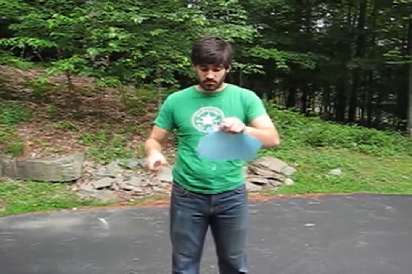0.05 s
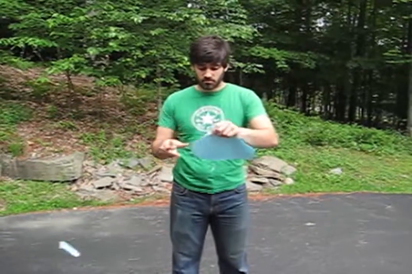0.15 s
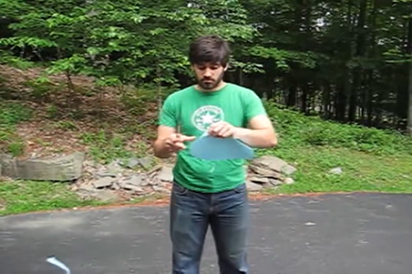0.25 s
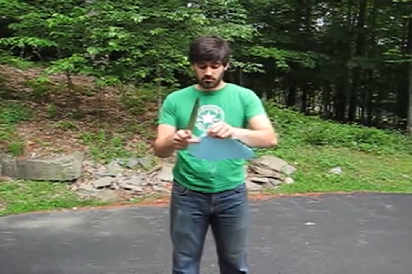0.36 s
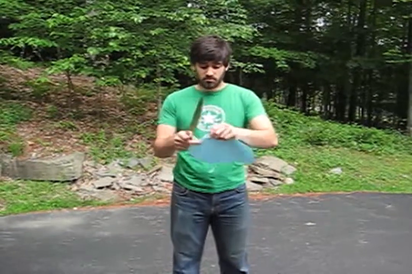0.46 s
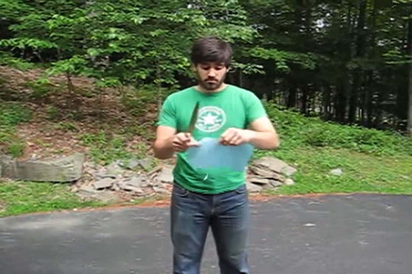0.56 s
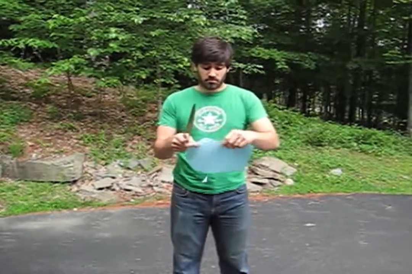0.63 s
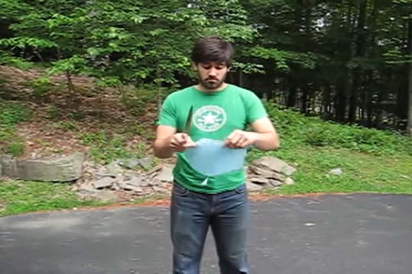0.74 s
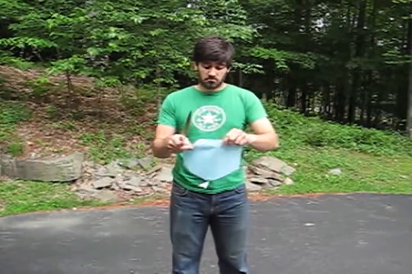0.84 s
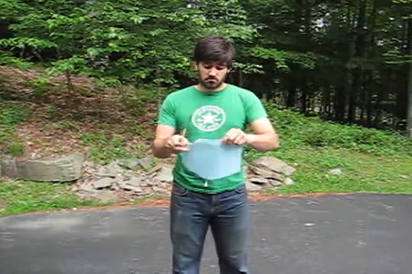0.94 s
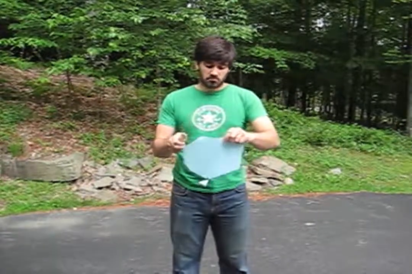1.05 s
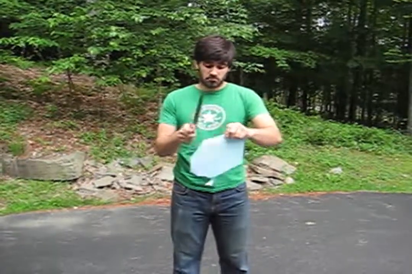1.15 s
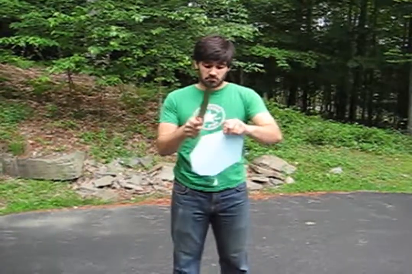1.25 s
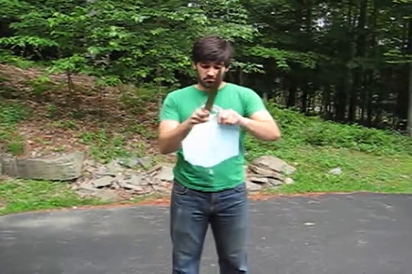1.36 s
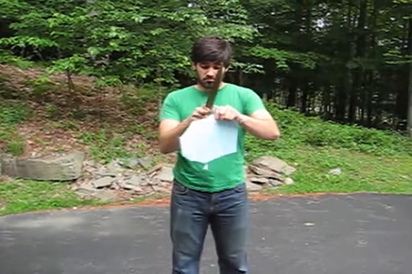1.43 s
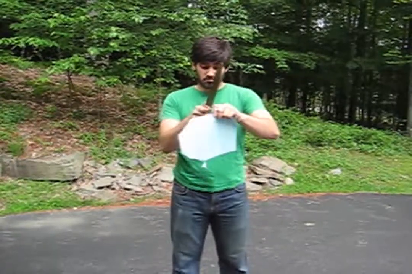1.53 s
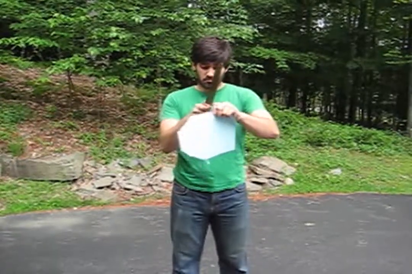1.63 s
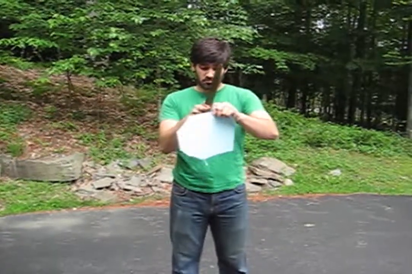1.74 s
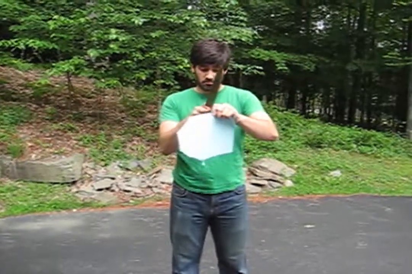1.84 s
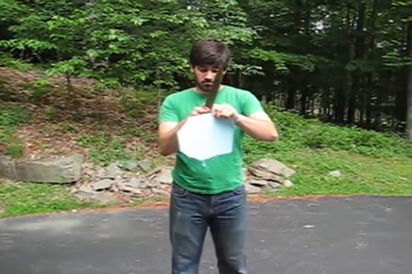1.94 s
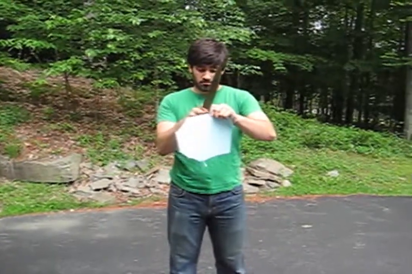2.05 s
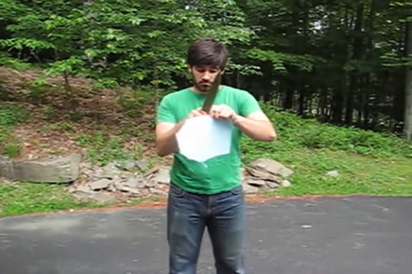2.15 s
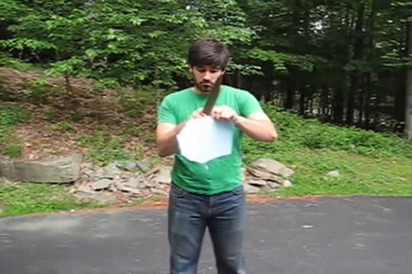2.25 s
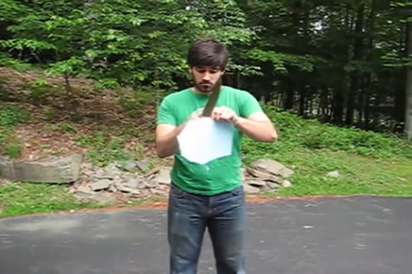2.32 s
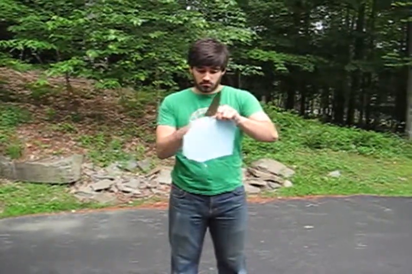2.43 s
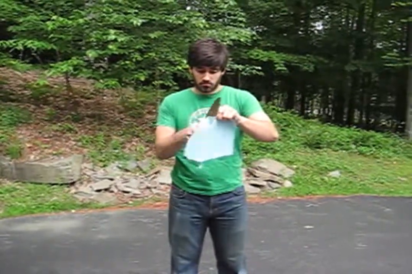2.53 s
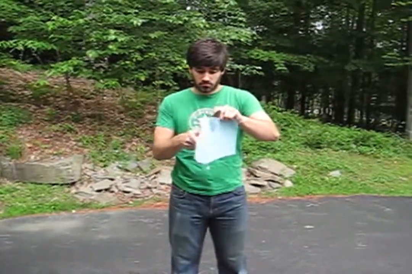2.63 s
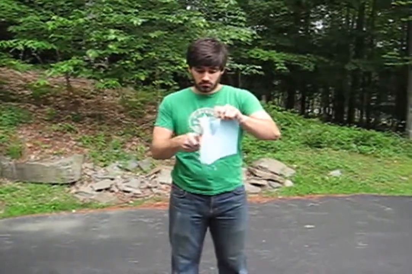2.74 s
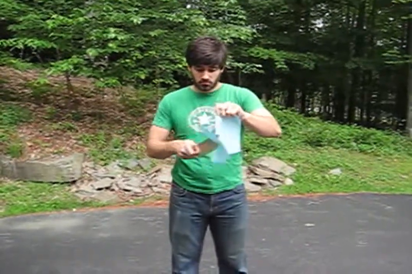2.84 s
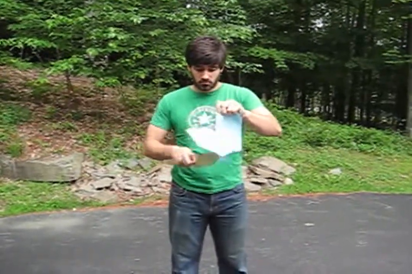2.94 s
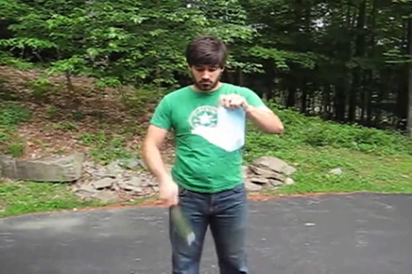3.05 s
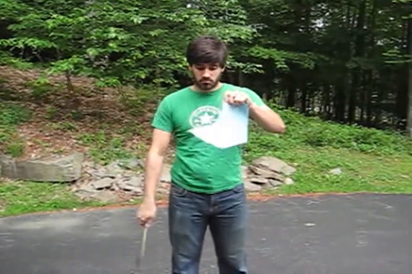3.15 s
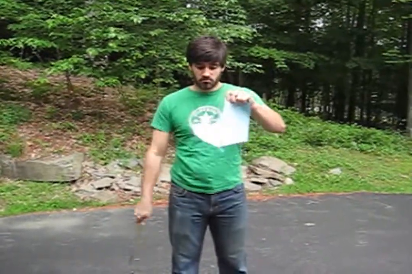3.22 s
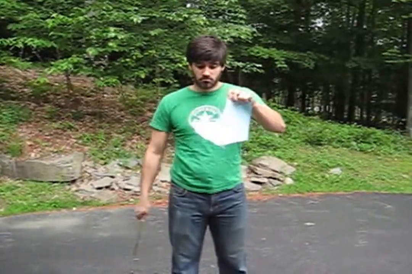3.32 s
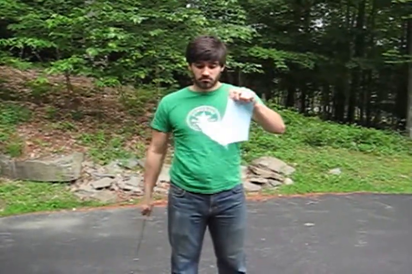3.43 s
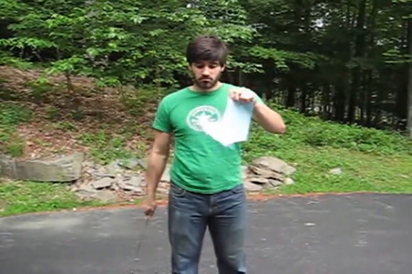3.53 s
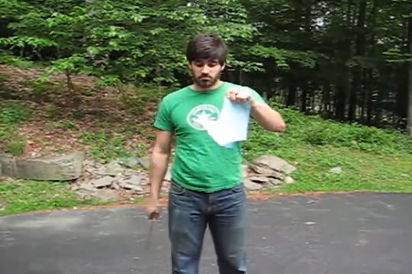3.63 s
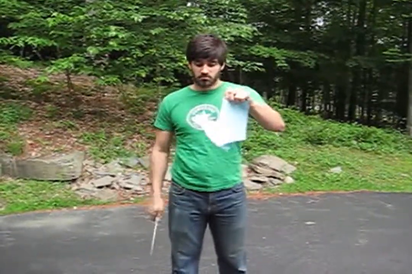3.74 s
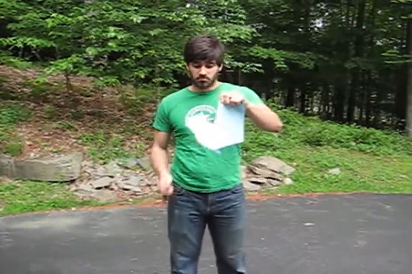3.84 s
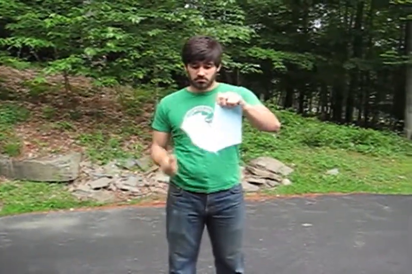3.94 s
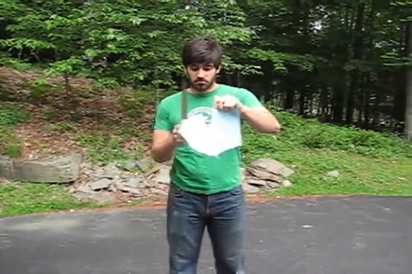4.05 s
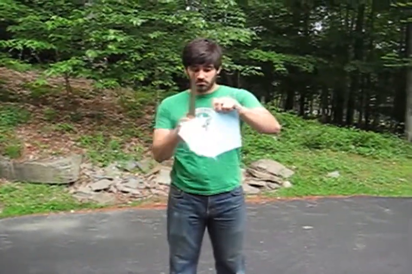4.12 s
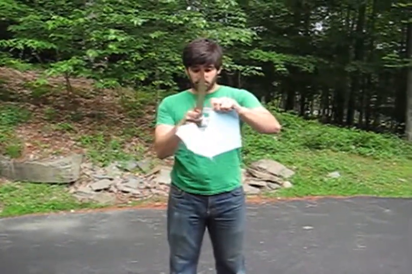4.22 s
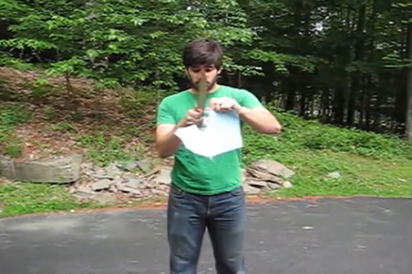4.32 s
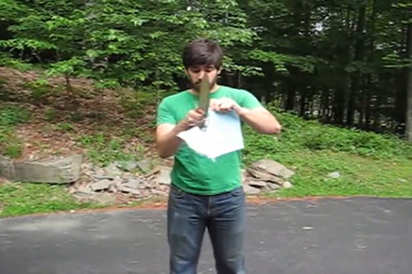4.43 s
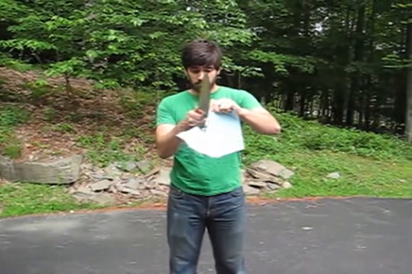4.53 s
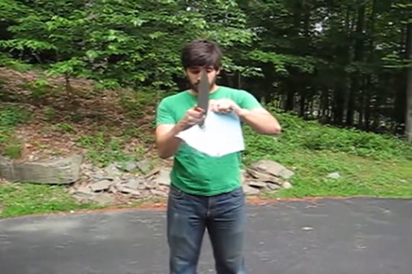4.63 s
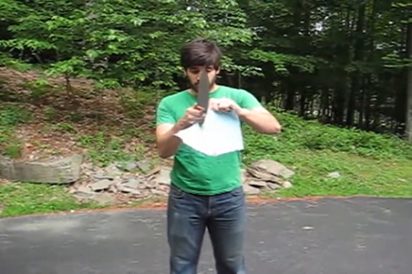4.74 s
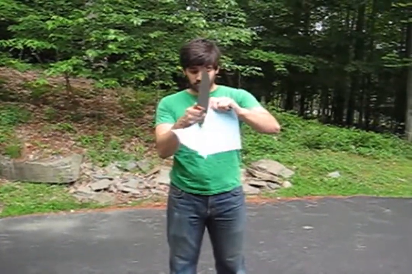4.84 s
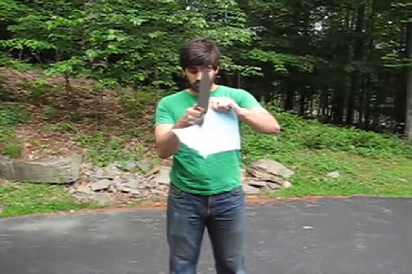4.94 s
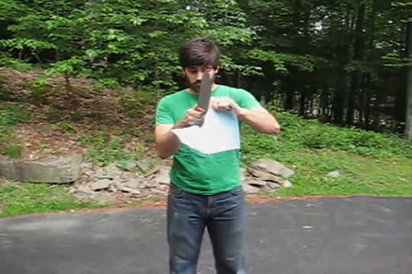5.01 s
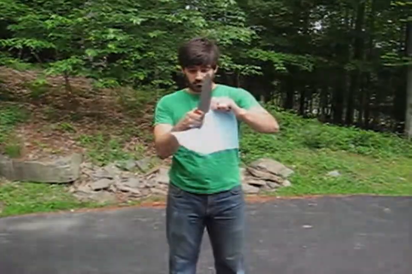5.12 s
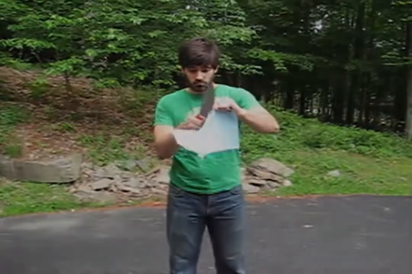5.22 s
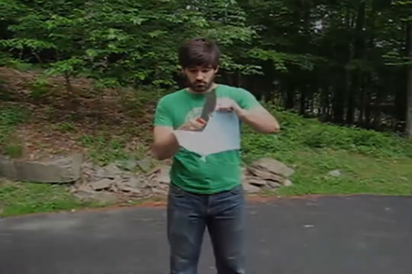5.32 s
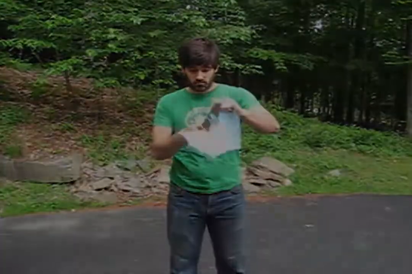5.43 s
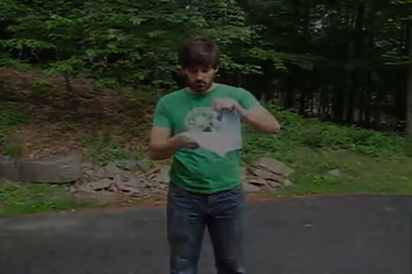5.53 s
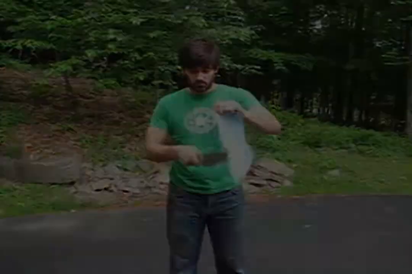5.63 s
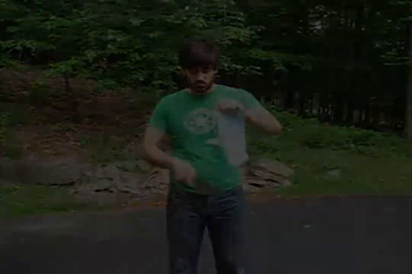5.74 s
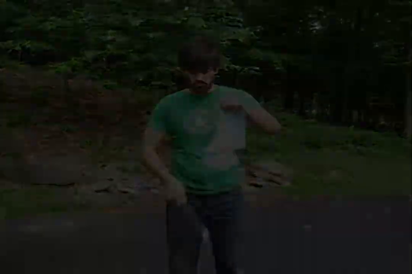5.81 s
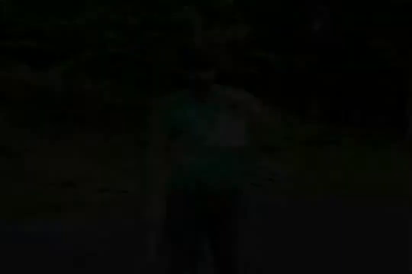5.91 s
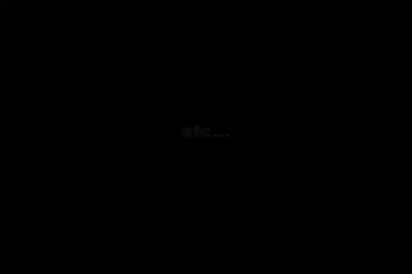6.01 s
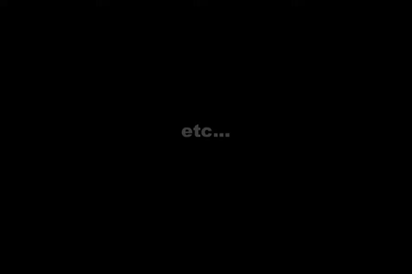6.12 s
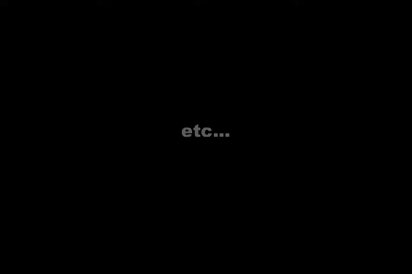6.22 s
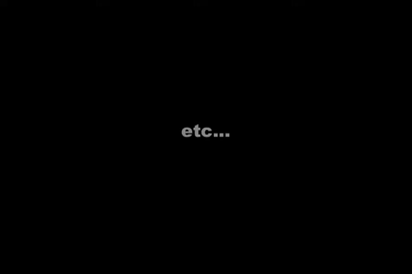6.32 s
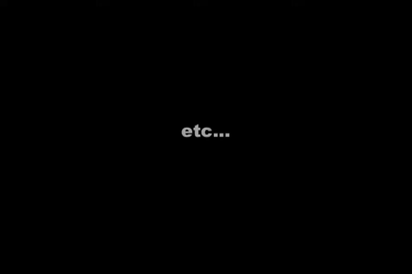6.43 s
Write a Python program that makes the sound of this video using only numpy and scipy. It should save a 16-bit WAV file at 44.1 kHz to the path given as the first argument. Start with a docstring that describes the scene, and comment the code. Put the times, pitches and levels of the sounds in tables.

```python
"""A knife nicks the edge of a hand-held sheet of paper, then draws two long cuts through it.
Fibres part as dense tiny cracks that drive the sheet; the edge snaps as the blade bites.
The place is a quiet paved drive outdoors; the asphalt returns one scattered echo 4.6 ms late.
Leaves and far air hiss behind, a far whistle sounds once and the camera whines faintly.
This background fades towards the end; the microphone loses the lowest bass and the very top."""
import sys
import numpy as np
from scipy import signal
from scipy.fft import rfft, irfft, next_fast_len
from scipy.io import wavfile
from scipy.ndimage import uniform_filter1d, map_coordinates

SR = 44100
rng = np.random.default_rng(int(sys.argv[2]) if len(sys.argv) > 2 else 0)


def magnitude_from_level(level_db):
    """Linear magnitude for a level in decibels (20 dB per decade)."""
    exponent = np.asarray(level_db, float) / 20
    return 10 ** exponent


def int16_out(signal):
    """Quantize to a 16-bit WAV file."""
    q = np.round(np.clip(np.atleast_2d(signal).T, -1, 1) * 32767)
    wavfile.write(sys.argv[1], SR, q.astype(np.int16))


N = 285319  # length in samples


def evened(x):
    """Scales x to rms 1."""
    return x / np.sqrt(np.mean(x ** 2) + 1e-20)


def read(points, hz):
    """Reads a spectrum in dB at hz, straight between its points on a log frequency axis."""
    f, value = np.transpose(points)
    return np.interp(np.log(hz + 1), np.log(f + 1), value)


def add(mix, s, sound):
    """Adds a sound to the mix from s seconds on."""
    part = mix[round(s * SR):][:len(sound)]
    part += sound[:len(part)]


def coloured(x, points):
    """Filters x by a spectrum; rms 1."""
    size = next_fast_len(len(x))
    gain = magnitude_from_level(read(points, np.fft.rfftfreq(size, 1 / SR)))
    return evened(irfft(rfft(x, size) * gain, size)[:len(x)])


def band(x, hz, share):
    """One resonance of width share x hz, the share held to 0.05-3."""
    b, a = signal.iirpeak(hz, 1 / np.clip(share, .05, 3), SR)
    return signal.lfilter(b, a, x)


def resonate(x, hz, width):
    """A moving resonance: shifts the curve hz down to zero, smooths, and shifts back."""
    turn = np.exp(2j * np.pi * np.cumsum(hz) / SR)
    r = np.exp(-np.pi * width / SR)
    return 2 * (turn * signal.lfilter([1 - r], [1, -r], x / turn)).real


def mottled(x, depth_db):
    """Random resonances that come and go as the free part of the sheet changes shape; rms 1."""
    z = signal.stft(x, nperseg=512, noverlap=384)[2]
    patches = rng.standard_normal(z.shape[::-1])
    patches = uniform_filter1d(uniform_filter1d(patches, 14, 0), 6, 1)  # over time, then frequency
    z = z * magnitude_from_level(depth_db * evened(patches).T)
    return evened(signal.istft(z, nperseg=512, noverlap=384)[1][:len(x)])


# The spectrum of leaves and distance around the drive.
# Each row: frequency in Hz, relative level in dB per Hz.
AIR = [(12, -45), (20, -19.5), (113, 2), (187, -0.5), (222, 0.5), (277, 1), (434, 1), (660, -0.5),
       (738, 1.5), (1660, -1.5), (3950, 0), (7310, -8), (9140, -13), (14700, -15.5), (16000, -32.5)]


def air():
    """Leaves and distance: random short-time spectra with mild patches and a slow swell."""
    level_db = -44.5  # rms
    frames, hz = N // 256 + 5, np.fft.rfftfreq(1024, 1 / SR)
    a, b, patches = rng.standard_normal((frames, 513, 3)).T
    patches = evened(uniform_filter1d(uniform_filter1d(patches, 14, 0), 16, 1))
    swell = evened(uniform_filter1d(rng.standard_normal(frames), 60))
    gain = magnitude_from_level(read(AIR, hz)[:, None] + .7 * patches + .5 * swell)
    hiss = signal.istft((a + 1j * b) * gain, nperseg=1024, noverlap=768)[1][:N]
    return magnitude_from_level(level_db) * evened(hiss)


# The steady tones of the camera at the microphone.
# Each row: frequency in Hz, rms level in dB.
WHINE = [(7558, -67), (15135, -72)]


def whine():
    """The camera's thin whine: steady sines."""
    t = np.arange(N) / SR
    return sum(magnitude_from_level(db) * np.sqrt(2) * np.sin(2 * np.pi * hz * t) for hz, db in WHINE)


def whistle():
    """One far, fuzzy whistle: narrow-band noise that swells and falls once."""
    start_s, end_s, hz, level_db = 1.68, 1.83, 3300, -53  # level before the swell
    noise = rng.standard_normal(round((end_s - start_s) * SR))
    fuzz = evened(band(noise, hz, .05))
    return start_s, magnitude_from_level(level_db) * fuzz * np.hanning(len(fuzz))


def asphalt(x):
    """One echo off the ground: grit and the sheet's underside scatter it; moving hands shift its delay."""
    delay_s, wander_s, level_db, scatter_t60 = .0046, .0001, -5, 0.0034
    scatter = rng.standard_normal(120) * magnitude_from_level(-60 * np.arange(120) / SR / scatter_t60)
    scatter[0] = 1.83  # the direct part of the reflection
    scatter = scatter / np.linalg.norm(scatter)
    echo = magnitude_from_level(level_db) * signal.oaconvolve(x, scatter)[:N]
    wander = evened(uniform_filter1d(uniform_filter1d(rng.standard_normal(N), 4000), 4000))
    return x + map_coordinates(echo, [np.arange(N) - SR * (delay_s + wander_s * wander)], order=3)


# Puffs of rustle as the sheet flexes in the hands.
# Each row: peak of the swell in seconds, level in dB before the swell, centre in Hz,
# width of each resonance pass as a share of the centre, t60 in seconds.
RUSTLES = [(.437, -41, 4000, 2.7, .048), (.526, -24, 2160, 1.3, 0.058), (.581, -50, 5000, 2.7, .12),
           (.594, -33, 2300, 0.84, 0.087), (.603, -24, 2100, 0.5, 0.11), (0.611, -23, 2120, 0.64, 0.058),
           (0.631, -34.5, 1300, 0.43, 0.14), (.998, -50, 12000, 0.66, .1), (1.0, -38.5, 2000, 3.1, 0.21),
           (1.043, -27, 2090, 0.93, 0.11), (1.04, -35, 6900, 0.64, 0.055),
           (1.945, -41.5, 4270, 0.27, 0.094), (2.096, -38, 3080, 3, .06), (2.286, -35, 302, 1.9, 0.047),
           (2.291, -23, 3513, 1.6, 0.098), (2.476, -20.5, 3060, 1.5, 0.21), (2.892, -16, 6600, 1.2, 0.063),
           (2.996, -23, 2500, 1.4, 0.038), (3.096, -34.5, 2470, 2.5, 0.036), (3.294, -41, 2250, 2, .1),
           (4.944, -33, 6000, 2.5, .1), (5.349, -47.5, 427, .4, 0.39), (5.63, -47, 420, 1.2, 0.18),
           (5.651, -29, 4000, 1.6, 0.12), (5.723, -35.5, 3140, 1, 0.14), (5.754, -35.5, 1920, 3.2, 0.1),
           (5.758, -34, 9100, 0.78, 0.033), (5.781, -35, 3800, 1.2, 0.035), (5.92, -58, 2980, 4.5, .1)]


def rustle(s, level_db, hz, share, t60, rise_share=0.029):
    """A swell of grainy noise in one resonance; its rise time is rise_share of its t60."""
    t = np.arange(-.08, .25, 1 / SR)
    grains = rng.standard_normal(len(t)) * magnitude_from_level(7.83 * rng.standard_normal(len(t)))
    swell = np.where(t < 0, np.exp(-(t / (rise_share * t60)) ** 2), magnitude_from_level(-60 * t / t60))
    puff = evened(band(band(grains, hz, share), hz, share))
    return s + t[0], magnitude_from_level(level_db) * swell * puff


# The taut sheet hums as the blade first bites.
# Each row: peak of the swell in seconds, level in dB before the swell, t60 in seconds.
HUMS = [(2.135, -37.5, 0.11), (2.178, -35, .08), (2.191, -27.5, 0.078), (2.212, -36, .12),
        (2.238, -36.5, .12), (2.26, -34, .1), (2.288, -37.5, 0.14), (2.312, -27.5, .12)]


def hum(s, level_db, t60):
    """A softer swell in the lowest resonance of the sheet."""
    return rustle(s, level_db, hz=803, share=0.2, t60=t60, rise_share=0.085)


# Single fibres breaking at the blade edge.
# Each row: centre in seconds, peak in dB, frequency in Hz.
TICKS = [(.4328, -27, 4500), (.5735, -7, 5500), (2.0645, -11, 3800), (2.085, -15, 5500), (2.2862, -6, 3300),
         (2.9455, -11, 6500), (4.9453, -9, 7000), (5.0467, -14, 10000), (5.061, -14, 10000),
         (5.0838, -15, 10000), (5.096, -14, 10000), (5.115, -13, 10000), (5.1225, -14, 10000),
         (5.155, -16, 10000), (5.6495, -14, 2000)]


def tick(s, peak_db, hz):
    """One fibre lets go: a cycle or two, with no ring."""
    t = np.arange(-20, 40) / SR
    sound = np.exp(-(t * hz / .75) ** 2) * np.sin(2 * np.pi * (hz * t + rng.random()))
    return s + t[0], magnitude_from_level(peak_db) * sound / abs(sound).max()


# The modes of the sheet, before each snap varies them.
# Each row: frequency in Hz, level in dB, t60 in seconds.
SHEET = [(830, 3, 0.033), (1717, 12.5, 0.016), (2006, -1, 0.025), (2670, 1.5, 0.013), (3676, 0, 0.0082),
         (4600, -7, 0.013), (6000, -4, 0.0097), (7300, 19.5, 0.0021), (9340, 12, 0.0059),
         (11800, 11.5, 0.002), (13490, 5, 0.0011)]
# Snaps of the paper edge under the blade.
# Each row: start in seconds, peak in dB, tilt of the low modes in dB, tilt of the high modes in dB.
SNAPS = [(0.189, -29, -27, -10), (0.4324, -33, -16, -21), (0.5252, -14.5, -11, -26.5),
         (0.5742, -9, -18, -17), (0.6, -19, -5, -27.5), (0.6399, -28, -1, -21), (1.0005, -24, 2, -17),
         (1.043, -14, -24, -25), (2.0645, -8.5, -17, -24), (2.0852, -8.5, -17, -22), (2.096, -20, -17, -18),
         (2.1286, -19, -17, -18), (2.2858, -5, -21.5, -31), (2.2903, -8, -29, -14.5),
         (2.2976, -12.5, -18, -20.5), (2.3064, -22, -18.5, -16.5), (2.369, -7, -27, -9),
         (2.3983, -16, -19.5, -15.5), (2.4226, -14, -21, -7), (2.9923, -29, -16, -26),
         (4.995, -29, -15, -16), (5.1673, -15.5, -27, -12), (5.6484, -17.5, -17, -22),
         (5.7219, -18, -43, -27), (5.7513, -22, -16, -19), (5.7555, -23, -31, -10),
         (5.7784, -25.5, -32, -23), (5.8084, -32, -9, -18)]


def snap(s, peak_db, low_db, high_db):
    """One sharp push sets the damped modes of the sheet going; where it lands decides their mix."""
    t = np.arange(2000)[:, None] / SR
    hz, db, t60 = np.transpose(SHEET)
    detune, uneven, phase = rng.standard_normal((3, len(hz)))
    colour_db = np.interp(hz, (1700, 2100, 6000, 7000), (low_db, 0, 0, high_db))
    modes = np.sin(2 * np.pi * hz * (1 + .06 * detune) * t + .8 * phase)
    sound = (modes * magnitude_from_level(db + colour_db + 1.5 * uneven - 60 * t / t60)).sum(1)
    sound = sound * np.minimum(t[:, 0] / .00015, 1)  # 0.15 ms onset
    return s, magnitude_from_level(peak_db) * sound / abs(sound).max()


# What three parts of the sheet pass: the hiss, the flapping free part, the finest fizz.
# Each row: frequency in Hz, relative level in dB per Hz.
HISS = [(2200, -75.5), (3100, 8.5), (4500, 12), (6500, 8.5), (7700, 4.5), (10000, -35.5)]
FLAP = [(300, -43.5), (520, -23.5), (740, 7), (1050, 1), (1500, 4.5), (2100, -22)]
FIZZ = [(6000, -41.5), (8200, 5), (11000, 8), (13200, 5.5), (14600, -10), (15600, -21.5), (17000, -43)]
# Blade or fingers moving on the sheet, one curve for each stroke.
# Each row: time in seconds, drag in dB, how freely the sheet rings in dB, crackle from 0 to 1.
NICKING = [(.42, -47.5, -19, 0), (.436, -44, 3.5, 0.04), (.456, -51, -24, 0.34), (.515, -45, 6, 0.31),
           (.65, -44.5, 2.5, .3), (.736, -46, -10, 0.4), (.756, -42, 4.5, 0.24), (.8, -37, -5, 0.16),
           (.83, -48, -3, 0), (.895, -49, -3, 0.05), (.915, -37, -7.5, 0.2), (.98, -54.5, -2, .2),
           (1.0, -49, -0.5, 0.4), (1.098, -50.5, -13, 0), (1.176, -51, -3, .1), (1.2, -59.5, -13, .1)]
FIRST_CUT = [(1.9, -61.5, 2.5, .2), (1.95, -48, -3.5, .2), (1.97, -61, 0, .05), (2.034, -40, -0.5, .05),
             (2.056, -62, -4, .05), (2.135, -38.5, -3.5, .15), (2.276, -36.5, 0.5, .2),
             (2.3, -31, 4.5, .25), (2.33, -33, -4.5, 0.13), (2.354, -25.5, -3.5, .25), (2.436, -26, 0, .15),
             (2.482, -26, -8, .1), (2.554, -25, -6, .05), (2.62, -24.5, -3.5, .07),
             (2.74, -25.5, 1.5, 0.17), (2.8, -26.5, -0.5, 0.26), (2.864, -25.5, -2.5, .2),
             (2.946, -24, -1, .25), (2.958, -44, 0, .2), (2.993, -38.5, 2.5, .05), (3.039, -45.5, -2, .1),
             (3.15, -58, 2, .15), (3.36, -62, 1, .3)]
SECOND_CUT = [(4.808, -55, -5, .1), (4.842, -40.5, -8, 0.23), (4.884, -49.5, -3, .2),
              (4.906, -40.5, -7, 0.35), (4.955, -39, -3, .2), (4.983, -42, -5.5, .3),
              (5.025, -34, -6, 0.35), (5.065, -39, -4.5, 0.45), (5.143, -35, -5.5, 0.42),
              (5.203, -29.5, -7, 0.39), (5.247, -27, -10.5, 0.22), (5.3, -29.5, -6, 0.23),
              (5.364, -27, -6, 0.15), (5.496, -26.5, -10.5, 0.032), (5.585, -30.5, -5, 0.25),
              (5.605, -39.5, -2.5, 0.23), (5.642, -33, -6, 0.41), (5.68, -38, -4.5, 0.47),
              (5.7, -48, 0, .1), (5.79, -57, -2, .05), (5.832, -55, -7, .05), (5.904, -72, 0, 0.14)]
# The base settings of each stroke, which its curve then moves.
# Each row: its curve, hiss resonance in Hz, sheet ring in Hz, flap in dB, fizz in dB when smooth.
STROKES = [(NICKING, 5700, 2180, -12, -11.5), (FIRST_CUT, 7000, 2290, -11.5, -13),
           (SECOND_CUT, 5900, 1970, -8, -14.5)]


def cut(rows, hiss_hz, ring_hz, flap_db, fizz_db):
    """Smooth tearing noise mixed with separate fibre cracks of uneven size excites four parts of the sheet."""
    s, *columns = np.transpose(rows)
    t = np.arange(s[0] - .004, s[-1] + .004, 1 / SR)
    drag_db, ring_db, crackle = (np.interp(t, s, column) for column in columns)
    crackle = np.clip(crackle, 0, 1)
    press_db = drag_db + 27  # drag relative to -27 dB

    # harder drag brightens the hiss and stills the flap; a freer sheet flaps more and rings lower
    hiss_hz = hiss_hz + 55.5 * press_db
    ring_hz = ring_hz - 26 * ring_db
    flap_db = flap_db + 0.94 * ring_db - 0.33 * press_db
    fizz_db = fizz_db + 30.5 * crackle

    chance, size = rng.random((len(t), 2)).T
    smooth, grit, drag = rng.standard_normal((len(t), 3)).T
    cracks = (chance < 1600 / SR) * magnitude_from_level(-3.0 * np.log(size + .03))  # 1600 a second on average
    burst = signal.lfilter([1], [1, -.8], cracks)  # each crack lasts a fraction of a ms
    drive = np.sqrt(1 - crackle) * smooth + np.sqrt(crackle) * evened(burst * grit)
    uneven_db = 0.87 * evened(uniform_filter1d(drag, 500))  # the blade drags unevenly
    drive = mottled(drive * magnitude_from_level(uneven_db), 1.16)

    ring = evened(resonate(resonate(drive, ring_hz, 1600), ring_hz, 1100))
    flap = magnitude_from_level(flap_db) * coloured(drive, FLAP)
    fizz = magnitude_from_level(fizz_db) * coloured(drive, FIZZ)
    hiss = coloured(drive + 0.57 * resonate(drive, hiss_hz, 2700), HISS)
    sheet = magnitude_from_level(ring_db) * ring + flap + fizz + hiss
    ends = np.sqrt(np.clip(np.minimum(t - t[0], t[-1] - t) / .008, 0, 1))  # 8 ms fades
    return t[0], magnitude_from_level(drag_db) * sheet * ends


def scene():
    """The paper with its ground echo, over the fading background; all sound stops at 6.033 s."""
    t = np.arange(N) / SR
    background = air() + whine()
    add(background, *whistle())
    fade = np.interp(t, (5.05, 6.074), (1, 0))

    paper = np.zeros(N)
    for play, table in ((rustle, RUSTLES), (hum, HUMS), (tick, TICKS), (snap, SNAPS), (cut, STROKES)):
        for row in table:
            add(paper, *play(*row))
    thin = signal.butter(2, 250, "high", fs=SR, output="sos")  # a thin sheet radiates no bass
    paper = signal.sosfilt(thin, paper)
    mix = asphalt(paper) + fade * background
    return (mix * (t < 6.033))[None]


def low_pass(x):
    """Removes everything above the highest recorded frequency."""
    return signal.sosfilt(signal.butter(12, 16500, fs=SR, output="sos"), x)


def record(dry):
    """The microphone loses the lowest bass and the very top."""
    mic = signal.sosfilt(signal.butter(2, 32, "high", fs=SR, output="sos"), dry)
    mic = signal.oaconvolve(mic, signal.firwin(255, 15900, fs=SR)[None], "same")
    return low_pass(mic)


dry = scene()
out = record(dry)
int16_out(out)
```